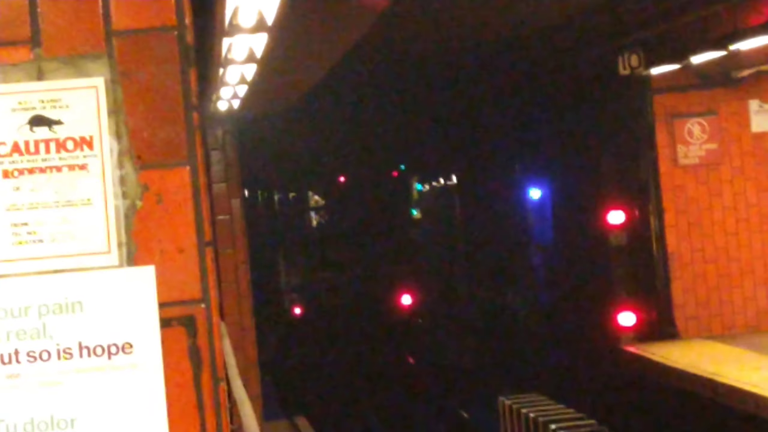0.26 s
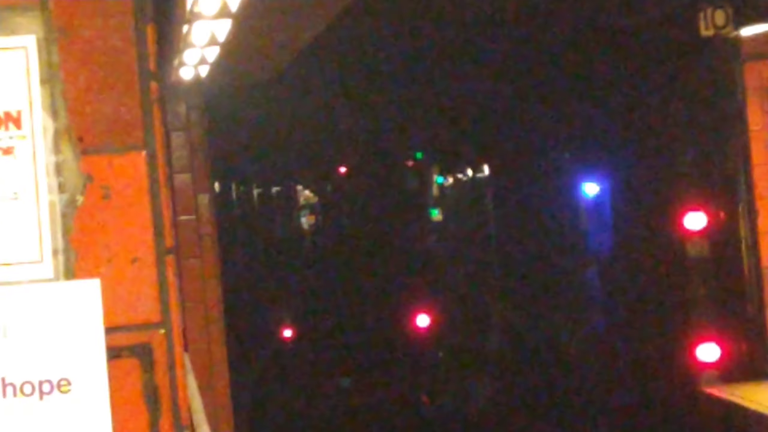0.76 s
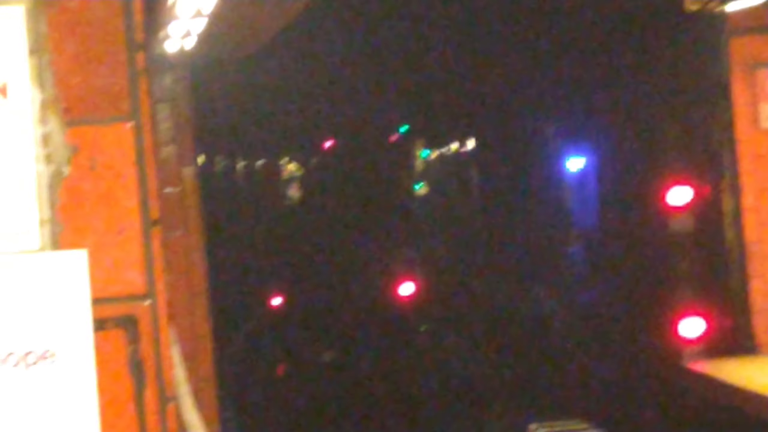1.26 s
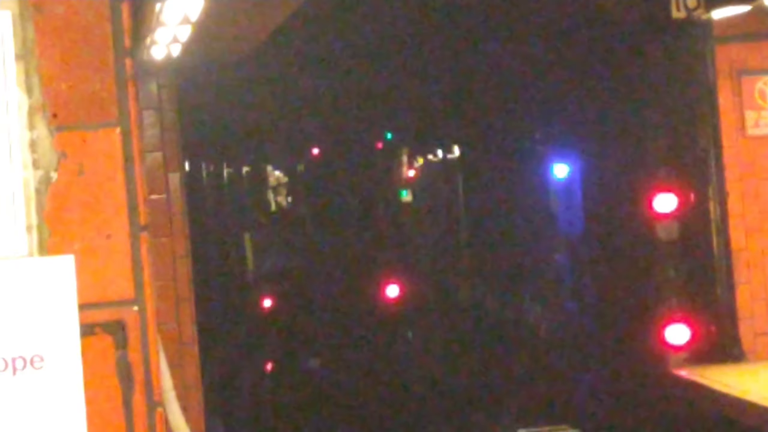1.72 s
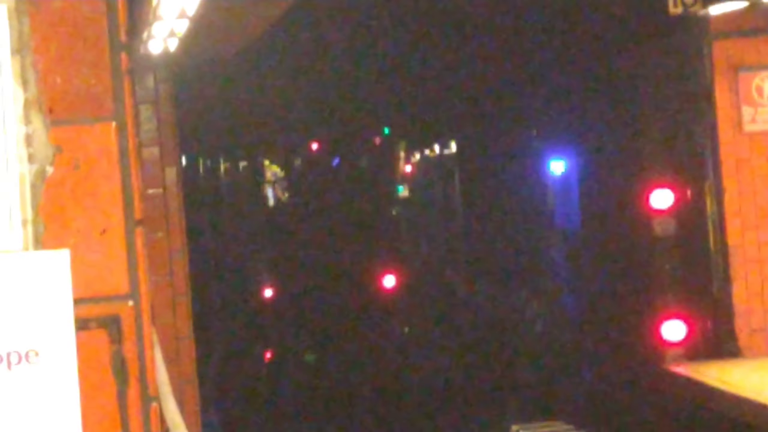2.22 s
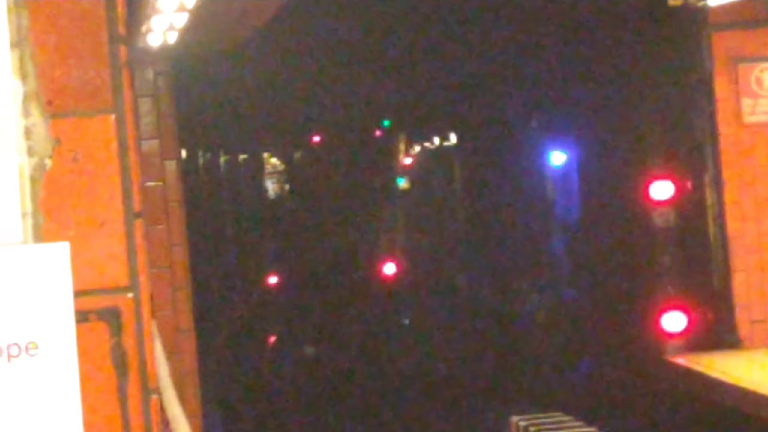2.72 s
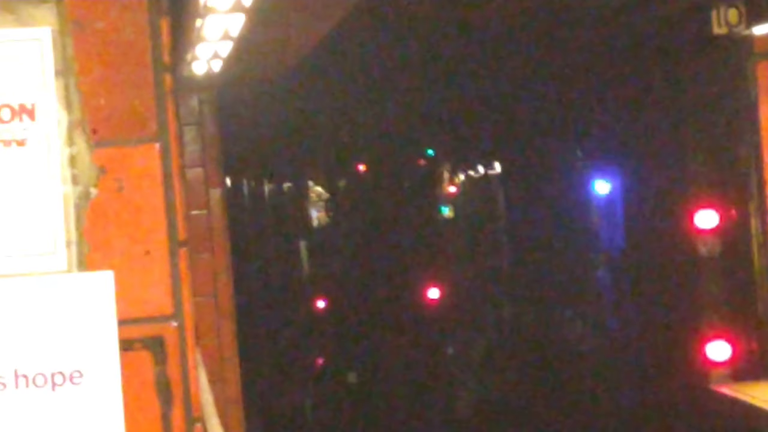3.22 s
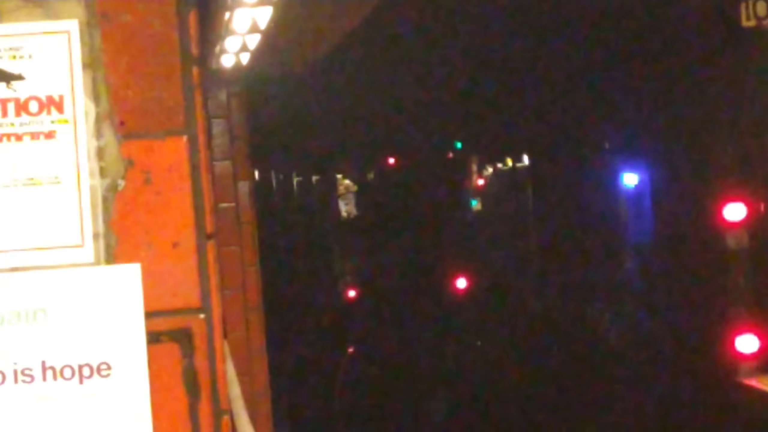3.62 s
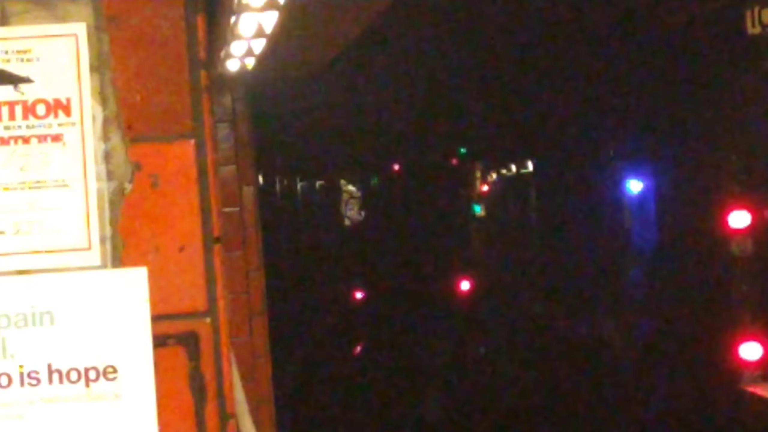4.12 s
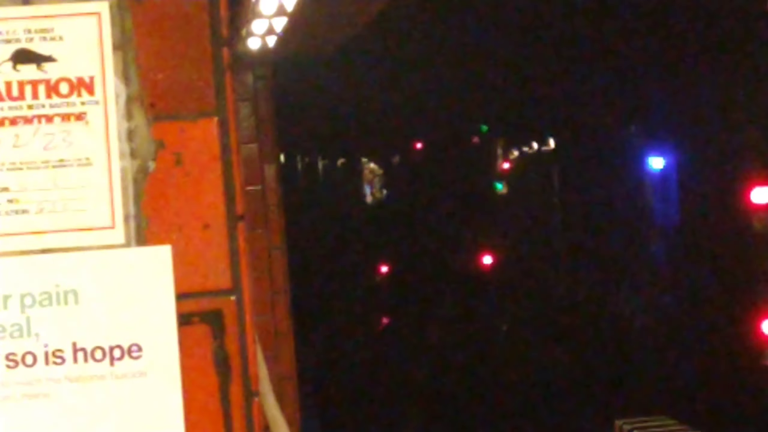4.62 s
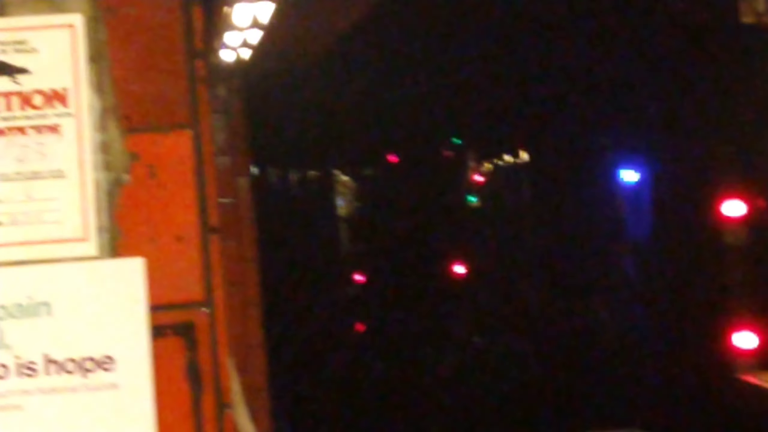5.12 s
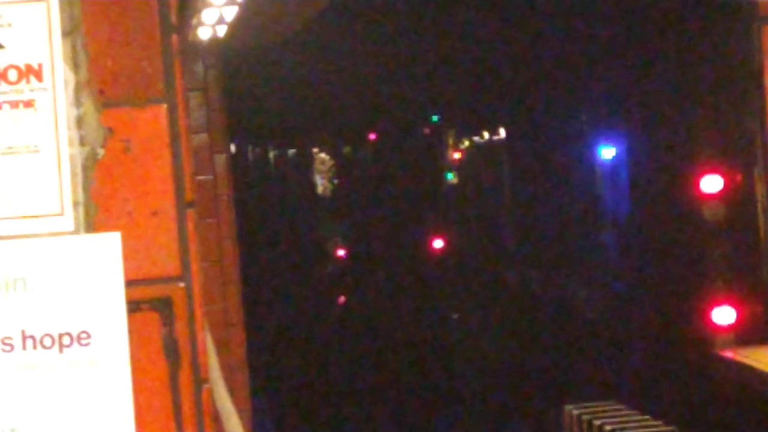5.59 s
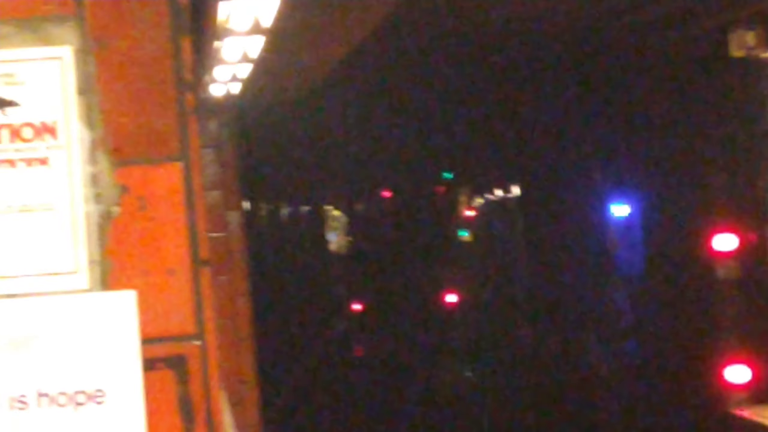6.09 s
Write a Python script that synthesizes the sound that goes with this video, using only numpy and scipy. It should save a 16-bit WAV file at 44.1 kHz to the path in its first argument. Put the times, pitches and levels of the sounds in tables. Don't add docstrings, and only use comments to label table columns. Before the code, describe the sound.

Low pure droning near 105 hertz wavers in a subway tunnel, dipping sharply and then growing loud, with throbbing draught and faint airy whistle beneath.

```python
import sys
import numpy as np
from scipy import signal
from scipy.fft import rfft, irfft, next_fast_len
from scipy.io import wavfile
from scipy.ndimage import uniform_filter1d, map_coordinates

SR = 44100
rng = np.random.default_rng(int(sys.argv[2]) if len(sys.argv) > 2 else 0)


def ratio(d):
    e = np.asarray(d, float) / 20
    return 10 ** e


def master(y):
    cut = np.clip(np.atleast_2d(y).T, -1, 1)
    pcm = np.round(cut * 32767)
    wavfile.write(sys.argv[1], SR, pcm.astype(np.int16))


N = 280035
TIME = np.arange(N) / SR


def unit(x):
    return x / np.sqrt(np.mean(x ** 2) + 1e-20)


def along(points, hz):
    f, value = np.transpose(points)
    return np.interp(np.log(hz + 1), np.log(f + 1), value)


def spectrum(points):
    return lambda hz: ratio(along(points, hz))


def curve(rows):
    times, values = np.transpose(rows)
    return np.interp(TIME, times, values)


def bell(middle, half_width):
    return np.exp(-((TIME - middle) / half_width) ** 2)


def bumps(rows):
    return sum(size * bell(s, half_width) for s, size, half_width in rows)


def wobble(rate):
    return map_coordinates(rng.standard_normal(400), [TIME * rate])


def filtered(x, response):
    n = x.shape[-1]
    m = next_fast_len(n + SR // 2)
    return irfft(rfft(x, m) * response(np.fft.rfftfreq(m, 1 / SR)), m)[..., :n]


# (frequency [Hz], left-right correlation)
LIKENESS = [(30, .985), (60, .99), (180, .975), (320, .91), (560, .65), (980, .12), (1500, -.2),
            (2200, .35), (3000, .15), (6000, .15), (9000, .2), (14000, .4)]


def rush(gain, patchy_db):
    z = signal.stft(rng.standard_normal((2, N + 512)), nperseg=512)[2]
    patches = uniform_filter1d(rng.standard_normal(z.shape[1:]), size=5, axis=0)
    patches = uniform_filter1d(patches, size=16, axis=1)
    pair = signal.istft(z * ratio(patchy_db * unit(patches)), nperseg=512)[1][:, :N]
    turn = lambda hz: np.arccos(np.clip(along(LIKENESS, hz), -1, 1)) / 2
    mid, side = filtered(pair, lambda hz: gain(hz) * [np.cos(turn(hz)), np.sin(turn(hz))])
    return unit(np.array([mid + side, mid - side]))


# (time [s], level [dB])
HUM_SWELL = [(0, -21.5), (0.5, -17.5), (0.74, -16.5), (0.82, -20.5), (1.65, -26), (1.93, -20), (2.3, -28),
             (2.5, -18), (2.68, -17.5), (2.75, -22), (3.12, -29), (3.44, -28), (3.7, -19.5), (4.3, -24),
             (4.44, -17), (5.24, -13.5), (5.86, -14.5), (6.33, -17.5)]


def hum_swell_db():
    return curve(HUM_SWELL)


# (time [s], depth [dB], half-width [s])
CANCELLATIONS = [(0.17, 8, .06), (0.33, 3, .08), (1.07, 5, 0.046), (1.261, 13.5, 0.055), (1.58, 4, .07),
                 (1.761, 12, 0.047), (2.05, 4, 0.027), (2.22, 5, .04), (2.32, 16, 0.045), (2.74, 8.5, .02),
                 (2.97, 9, 0.044), (3.14, 6, .04), (3.24, 2.5, 0.07), (3.49, 13, 0.03), (3.57, 6.5, .04),
                 (3.92, 7, 0.055), (4.11, 3.5, 0.057), (4.349, 6, .05), (4.889, 1.6, 0.19),
                 (6.275, 7.5, 0.013), (6.325, 5, 0.017)]


def hum_db():
    kept = [1 - (1 - ratio(-abs(depth_db))) * bell(s, half_width) for s, depth_db, half_width in CANCELLATIONS]
    return hum_swell_db() + 20 * np.log10(np.prod(kept, axis=0))


def gain_control_db():
    knee_db, press_db, grip_s, recover_s = -14.5, 6, .06, .9
    trip = np.argmax(hum_swell_db() > knee_db)
    since = np.maximum(np.arange(N) - trip, 0) / SR
    return -press_db * (1 - np.exp(-since / grip_s)) * np.exp(-since / recover_s)


# (time [s], strength [dB])
AIRFLOW = [
    (0, 2.5),
    (0.4, 0),
    (1.9, -0.5),
    (2.2, -1.5),
    (3.3, -1),
    (4.2, -3),
    (4.8, -2.5),
    (5.6, -3),
    (6.3, -0.5),
]


def airflow_db():
    return curve(AIRFLOW)


def hiss_dips():
    spacing, first_dip = 1024, 440
    place = (np.arange(N) - first_dip) / spacing
    dip = np.round(place).astype(int)
    depth_db = 2.9 * rng.exponential(size=dip.max() + 1)[dip] * ratio(.3 * (hum_db() + 23.5))
    return -np.minimum(depth_db, 9) * np.cos(np.pi * place) ** 4


# (frequency [Hz], density [dB per Hz])
HISS_SPECTRUM = [(1500, -27), (3000, 0.5), (3400, -1), (3750, 0.5), (5000, -2.5), (7000, -5.5),
                 (8200, -5.5), (9000, -9), (10700, -14.5), (12000, -16), (14000, -20), (15500, -19.5)]
# (time [s], change [dB], half-width [s])
HISS_SAGS = [
    (4.22, -1.5, 0.11),
    (4.46, -0.5, .04),
    (4.59, -4.5, 0.019),
    (6.25, -1, .2),
]


def hiss():
    upper = lambda f: 1 / (1 + (8500 / (f + 1)) ** 8)
    tilt = spectrum(HISS_SPECTRUM)
    low = rush(lambda f: tilt(f) * np.sqrt(1 - upper(f)), patchy_db=0.3)
    high = rush(lambda f: tilt(f) * np.sqrt(upper(f)), patchy_db=1.4)
    low_db = -63.5 + bumps(HISS_SAGS) + .6 * hiss_dips()
    high_db = -73.0 + 0.67 * hiss_dips()
    flutter_db = 0.5 * wobble(6.9) + .5 * wobble(22) + .5 * hiss_dips()
    return ratio(flutter_db) * (ratio(low_db) * low + ratio(high_db) * high)


# (multiple of 120 Hz, level [dB rms])
BALLAST_LINES = [(17, -77), (18, -87.5), (19, -80), (22, -86), (25, -77), (26, -82.5), (28, -86)]


def lamps():
    def line(multiple, db):
        level = ratio(db + 2.5 + 2.5 * wobble(7.4))
        return level * np.sin(2 * np.pi * 120 * multiple * TIME + 0.96 * wobble(4.4))
    return np.array([sum(line(k, db) for k, db in BALLAST_LINES) for ear in "LR"])


# (frequency [Hz], density [dB per Hz])
THROB_SPECTRUM = [(18, -59.5), (30, -18), (50, -10), (72, -1), (90, -5), (120, -27), (200, -72),
                  (400, -120)]
# (time [s], rise [dB], half-width [s])
PRESSURE_THROBS = [(0.25, 3, 0.69), (0.84, 14.5, .07), (1.02, 2, .09), (1.8, 5, 0.34), (2.45, 5, .12),
                   (2.85, 8, 0.12), (3.35, 5.5, 0.11), (3.68, 6.5, 0.11), (3.93, 7.5, 0.14),
                   (4.63, 6.5, 0.13), (4.93, 1, 0.086), (5.17, 3.5, 0.055), (5.44, 5, .07),
                   (5.62, 9.5, 0.096), (6.1, 5, .3)]


def throbs():
    return ratio(-40.5 + bumps(PRESSURE_THROBS)) * rush(spectrum(THROB_SPECTRUM), patchy_db=2)


# (frequency [Hz], density [dB per Hz])
RUMBLE_SPECTRUM = [(60, -49), (90, -10.5), (130, -3.5), (165, -0.5), (200, -7.5), (250, -9), (280, -8),
                   (340, -13.5), (420, -16.5), (460, -16), (600, -34), (1000, -56), (3000, -120)]


def rumble():
    level_db = -34 + .6 * airflow_db() + 0.73 * gain_control_db()
    return ratio(level_db + 0.74 * wobble(7.8)) * rush(spectrum(RUMBLE_SPECTRUM), patchy_db=1.0)


# (frequency [Hz], density [dB per Hz])
ROAR_SPECTRUM = [(280, -31.5), (480, -11.5), (593, -11), (729, -10.5), (1060, -13.5), (1700, -19),
                 (2210, -47.5), (3740, -120)]


def roar(gust):
    level_db = -49.5 + airflow_db() + gain_control_db()
    return ratio(level_db + 0.66 * gust) * rush(spectrum(ROAR_SPECTRUM), patchy_db=0.44)


# (frequency [Hz], density [dB per Hz])
DUCT_SPECTRUM = [(940, -32), (1600, -5), (2100, 1), (2300, -2), (2550, -6.5), (2800, -5), (3100, -9.5),
                 (3250, -16.5), (4500, -42), (7600, -120)]
# (time [s], rise [dB], half-width [s])
DUCT_WHOOSHES = [
    (1.78, 2.5, 0.18),
    (2.82, 2.5, 0.15),
    (3.6, 0.5, 0.13),
    (4.45, 2, 0.11),
    (4.8, 3, 0.17),
    (5.6, 3, .12),
]


def duct(gust):
    level_db = -57 + airflow_db() + gain_control_db() + bumps(DUCT_WHOOSHES)
    return ratio(level_db + 0.26 * gust) * rush(spectrum(DUCT_SPECTRUM), patchy_db=1.3)


def air():
    gust = wobble(5.3)
    return throbs() + rumble() + roar(gust) + duct(gust)


# (multiple of blade rate, width [Hz], level [dB])
BLURRED_TONES = [
    (2, 24, 1.5),
    (3, 15, -9.5),
]
# (time [s], rise [dB], half-width [s])
OVERTONE_SURGES = [
    (0.05, 5, 0.028),
    (0.86, 3.5, 0.14),
    (1.3, 9.5, 0.18),
    (1.8, 6, 0.088),
    (2.8, 6, 0.17),
    (3.65, 2.5, 0.16),
    (4.61, 6, .07),
    (5.4, 2, .06),
]


def overtones(blade_hz):
    level_db = -41.5 + 0.47 * airflow_db() + gain_control_db()
    sound = 0
    for k, width, db in BLURRED_TONES:
        peak = lambda f: 1 / (1 + ((f - k * blade_hz) / (width / 2)) ** 2)
        surge_db = bumps(OVERTONE_SURGES) / (k - 1)
        sound = sound + ratio(level_db + surge_db + db) * rush(peak, patchy_db=0.5)
    return sound


# (time [s], blade rate [Hz])
BLADE_RATE = [
    (0, 105.2),
    (2.9, 104.4),
    (3.2, 105.6),
    (4.2, 105.4),
    (6.35, 105.1),
]
# (time [s], hum left minus right [dB], half-width [s])
HEAD_TURNS = [
    (1.6, -3.5, 0.76),
    (3.08, -3, 0.18),
    (4.36, -2, 0.093),
]


def fan():
    hz, level_db = curve(BLADE_RATE), hum_db()
    turns = (np.cumsum(hz) - hz.sum()) / SR - .22
    wander = .4 * ratio(-.8 * (level_db + 22)) * wobble(7)
    tone_db = level_db + 0.4 * wobble(7.9) + 0.52 * wobble(40)
    tone = np.sqrt(2) * ratio(tone_db) * np.sin(2 * np.pi * turns + wander)
    across = np.sqrt(2) * ratio(-44.5 + 3 * wobble(4)) * np.sin(2 * np.pi * turns + 0.6 * wobble(3.3))
    pan = ratio((-0.05 + bumps(HEAD_TURNS)) * np.array([[.5], [-.5]]))
    return pan * tone + across * np.array([[1], [-1]]) + overtones(hz.mean())


def scene():
    return hiss() + lamps() + air() + fan()


# (frequency [Hz], left minus right [dB])
MICROPHONE_LEAN = [(60, 0.53), (340, -0.8), (900, -0.5), (2500, -3), (5000, 0), (9000, -1.3), (14000, 2)]


def microphones(dry):
    edge = 1024
    running = np.pad(dry, ((0, 0), (edge, edge)), 'reflect')
    lean = lambda hz: ratio(along(MICROPHONE_LEAN, hz) * [[.5], [-.5]])
    return filtered(running, lean)[:, edge:-edge]


def low_pass(x):
    return signal.sosfilt(signal.butter(12, 15730, fs=SR, output="sos"), x)


def record(dry):
    mix = microphones(dry)
    return low_pass(mix)


dry = scene()
out = record(dry)
master(out)
```